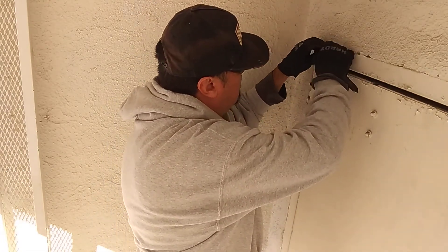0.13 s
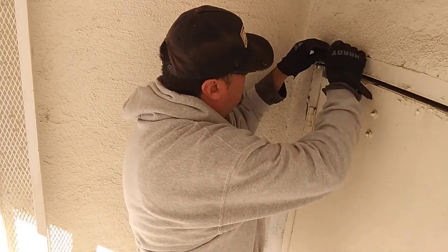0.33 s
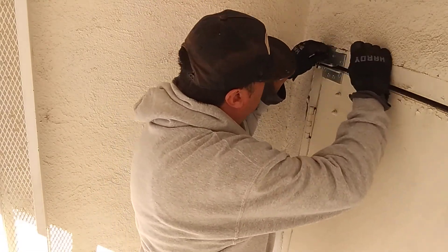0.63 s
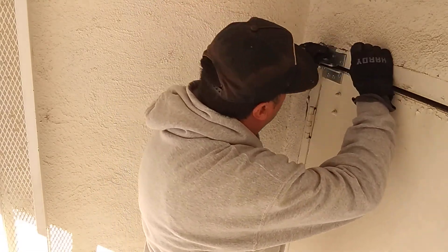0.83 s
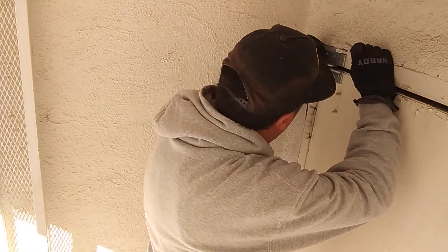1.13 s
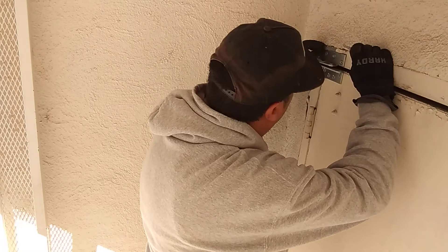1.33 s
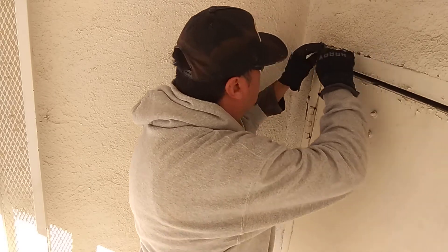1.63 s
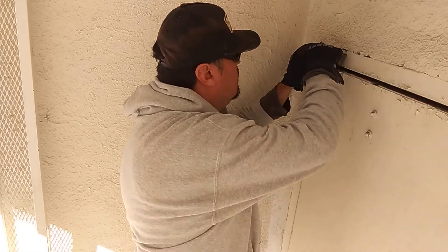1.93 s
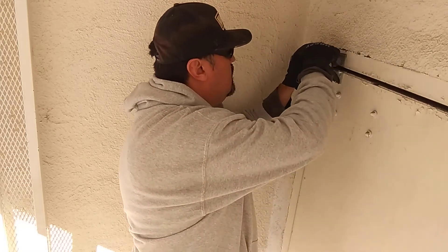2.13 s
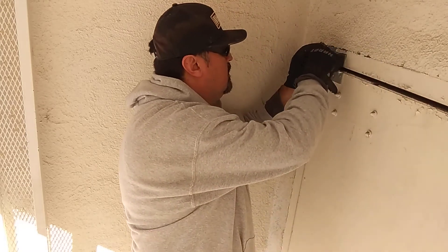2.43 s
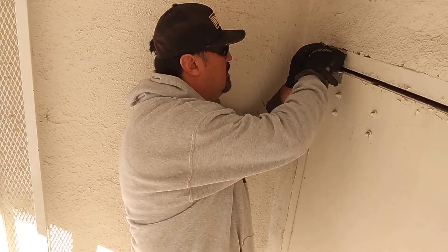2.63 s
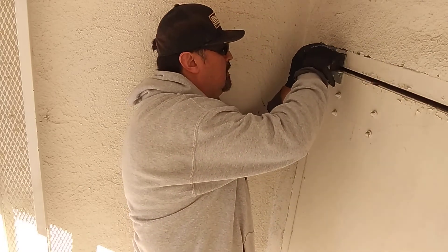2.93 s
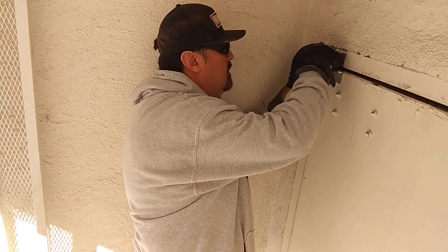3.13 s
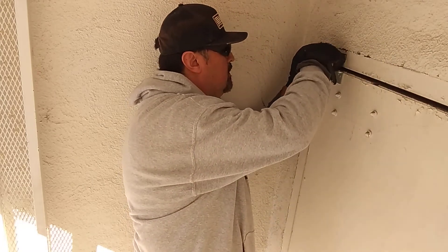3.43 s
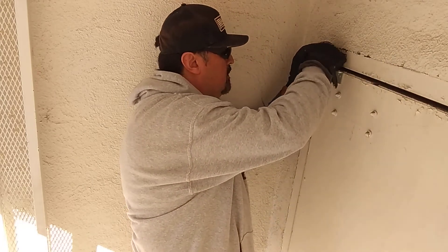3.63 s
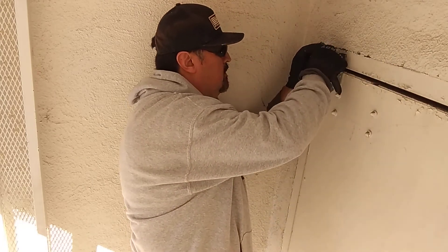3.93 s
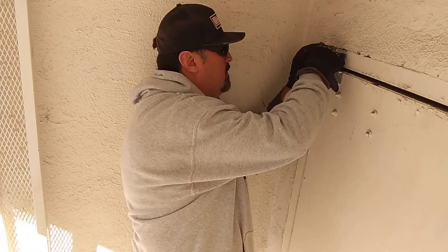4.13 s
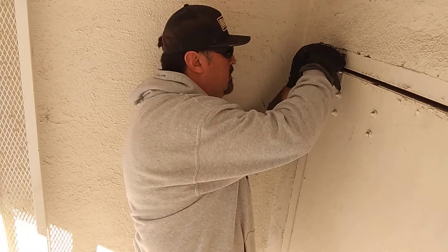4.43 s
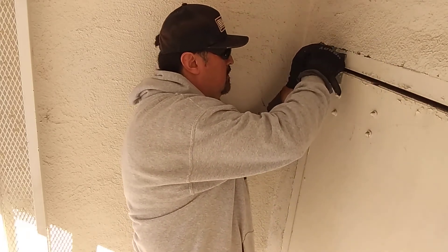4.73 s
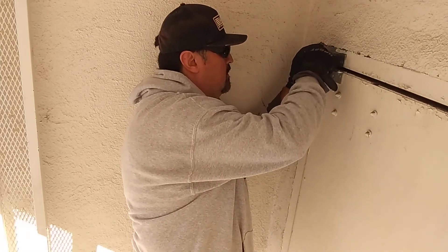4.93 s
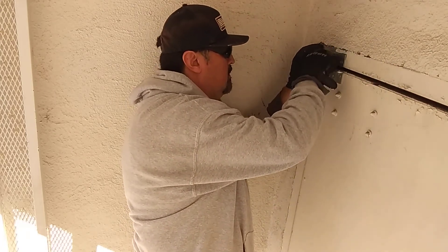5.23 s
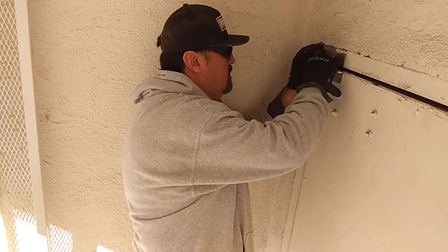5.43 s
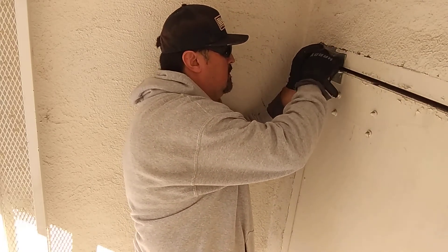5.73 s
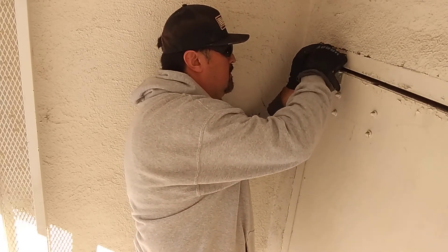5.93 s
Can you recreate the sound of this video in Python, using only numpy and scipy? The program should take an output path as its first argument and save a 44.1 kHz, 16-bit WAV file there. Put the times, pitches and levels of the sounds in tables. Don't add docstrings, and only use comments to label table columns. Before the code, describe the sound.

Close, dry metal clicks and scrapes, uneven in timing, from a tool tip slipping on a hinge plate. Small pinging knocks open, a dense clattering slip bursts out before three seconds, then isolated taps and one firm double knock near five. Fine paint grit crackles and gloves rustle. Far traffic murmurs under light hiss in a small hard-walled porch; a thin steady whine appears at the end.

```python
import sys
import numpy as np
from scipy import signal
from scipy.fft import rfft, irfft, next_fast_len
from scipy.io import wavfile
from scipy.ndimage import uniform_filter1d, map_coordinates

SR = 44100
rng = np.random.default_rng(int(sys.argv[2]) if len(sys.argv) > 2 else 0)


def ratio_of_db(decibels):
    return 10 ** (np.asarray(decibels, float) / 20)


def store_pcm(level_fs):
    pcm = np.round(np.clip(level_fs, -1, 1) * 32767).astype(np.int16)
    wavfile.write(sys.argv[1], SR, np.atleast_2d(pcm).T)


N = 267907

# start in seconds, plate level in dB, shank level in dB,
# plate mode in Hz, shank mode in Hz.
SLIPS = [(.0014, -42, -43.5, 1370, 4200), (.936, -39, -46, 1620, 3700), (1.013, -49.5, -42.5, 2400, 4890),
         (1.382, -39, -33, 2340, 3700), (1.991, -41.5, -44.5, 1790, 4100),
         (2.208, -22.5, -28.5, 2050, 4890), (2.5264, -37, -30.5, 1870, 6400),
         (2.5935, -18, -12.5, 1700, 6320), (2.629, -34, -32, 2060, 6480), (2.66, -21.5, -19, 2040, 6510),
         (2.7153, -21.5, -21, 1770, 6400), (2.7522, -27, -28, 1830, 6500), (2.795, -32, -33, 1530, 3940),
         (2.8144, -34, -32.5, 1990, 6540), (2.934, -35, -36.5, 2030, 4400), (4.21, -26, -30, 1784, 4110),
         (5.0995, -19, -20, 1770, 4110), (5.866, -46, -58, 1600, 5540), (5.998, -42, -54, 1960, 4480),
         (6.03, -35.5, -38, 1580, 5720)]
# as for SLIPS, in seconds, dB, dB, Hz, Hz.
TAPS = [(.315, -25.5, -35, 2210, 3560), (.716, -45, -44.5, 1820, 4660), (.752, -43.5, -44, 1840, 4600),
        (.79, -50, -42, 1720, 4660), (.8597, -28.5, -26, 1773, 6850), (.918, -41, -39.5, 1450, 4560),
        (1.112, -62, -44, 2210, 4470), (2.167, -62, -57, 1300, 4890), (3.112, -45, -41, 2020, 4500),
        (3.671, -35, -31, 2000, 4110), (4.551, -24.5, -30, 2060, 6500), (5.0285, -28, -30, 2030, 5000),
        (5.1346, -20.5, -23, 1770, 4050), (5.322, -46, -70, 1300, 3950), (5.448, -36, -42, 1670, 6550),
        (5.476, -45, -53, 1570, 5370), (5.488, -29, -41, 1800, 3940), (5.555, -43, -56, 1930, 4200)]
# start in seconds, plate level in dB,
# shank level in dB, plate mode in Hz, plate contact in seconds.
PINGS = [(.0424, -27, -32.5, 1770, .014), (.0634, -28.5, -41, 1770, .0063), (.289, -35, -46, 2140, .004),
         (2.08, -39.5, -48, 1780, .0095), (2.501, -28, -35.5, 1910, .0027), (3.698, -42, -50, 1960, .0048),
         (3.921, -40.5, -43, 1810, .0015), (5.388, -24, -40, 1700, .0006), (5.92, -40, -56, 1870, .003)]
# start in seconds, plate level in dB, shank level in dB,
# shank mode in Hz.
BRUSHES = [(.685, -48, -55, 4590), (1.241, -57, -52, 4640), (1.28, -50, -51, 4700), (1.364, -58, -45, 6650),
           (1.469, -47, -51, 4670), (2.469, -49, -46.5, 4710), (3.05, -57, -57, 4670),
           (3.464, -49, -51, 3710), (3.79, -49, -46, 4700), (4.013, -49.5, -64, 5550),
           (4.69, -42.5, -64, 3850), (5.255, -62, -60, 4870), (5.83, -53, -70, 4100)]
# start in seconds, peak level in dB, mode in Hz.
THUMPS = [(.063, -35, 930), (0.312, -43, 480), (2.213, -40, 380), (2.593, -36, 400), (3.672, -38, 500),
          (4.211, -43, 480), (4.55, -38, 460), (5.029, -34, 1050), (5.094, -39.5, 460), (5.134, -43, 354),
          (5.486, -37, 424), (5.51, -39, 400)]
# start in seconds, peak level in dB,
# brightness in dB per octave.
FLAKES = [(.001, -54, 0), (.042, -41, -3), (.288, -52, 2), (.314, -44, 8), (.715, -53, 4), (.752, -52, 4),
          (.789, -48, 6), (.86, -38, -3), (.918, -56, 10), (.936, -53, 0), (1.112, -48, 3),
          (1.383, -32, -4), (2.206, -37, 4), (2.4995, -45, -1), (2.594, -40, 3), (2.629, -41, 3),
          (2.661, -33, 4), (2.715, -37, 8), (2.795, -45, 0), (3.113, -48, -4), (3.672, -55, 3),
          (3.697, -49, -1), (3.79, -53, 0), (4.209, -45, -4), (4.551, -41, 1), (5.028, -45, -3),
          (5.099, -32.5, 7), (5.134, -38, 0), (5.387, -47, -4), (5.487, -54, 0)]
# start in seconds, end in seconds, rasp level in dB,
# plate level in dB.
STROKES = [(0.232, 0.377, -65.5, -80), (1.987, 2.108, -66, -52.5), (2.267, 2.358, -65.5, -61),
           (2.492, 2.565, -56, -43), (2.62, 2.72, -70, -44), (2.75, 2.872, -50, -47),
           (3.66, 3.757, -59, -62), (4.174, 4.245, -64, -48), (4.65, 4.738, -63, -63),
           (5.817, 5.95, -76, -60), (5.973, 6.066, -64, -58)]
# time in seconds, effort in dB.
RUB_EFFORT = [(0, -55), (.12, -68), (.32, -63.5), (.74, -62.5), (1.3, -62), (1.55, -76), (2.04, -82),
              (2.2, -68), (2.57, -63), (2.65, -48), (2.72, -52), (2.87, -62), (3.11, -76), (3.7, -63),
              (4.4, -73), (4.68, -62), (5.07, -76), (5.4, -68)]

# centre in Hz, width in Hz, level in dB.
PLATE_MODES = [(1537, 673, -4.5), (1770, 148, 2.5), (2084, 303, 0.5), (2390, 680, -5.5)]
SHANK_MODES = [(3185, 1500, -18), (4100, 620, -7.5), (4890, 470, -8), (5845, 390, -8), (6490, 630, -8),
               (7170, 1180, -12.5)]
DOOR_MODES = [(655, 154, 2.5), (822, 180, 5), (934, 110, 10.5), (1163, 230, 4)]
# frequency in Hz, level in dB per Hz.
FIZZ_SPECTRUM = [(1500, -60), (3000, -16), (5000, -15), (7500, -8), (9000, -2.5), (11600, -5.5),
                 (13500, -13), (16000, -18)]

# delay in seconds, level in dB.
KNOCK_PATHS = [(.0, 1), (.0095, -10), (.019, -15)]
# delay in seconds, level in dB.
RASP_PATHS = [(.0, -5), (.003, -4.5), (.006, -2.5), (.0095, 3.5), (0.011, -7.5), (.016, -6), (.036, -12.5)]
# delay in seconds, level in dB.
FIZZ_PATHS = [(.0, -3), (.011, -10), (.024, -8.5)]
# frequency in Hz, time to fall 60 dB in seconds.
PORCH_T60 = [(200, 0.5), (530, 0.68), (1400, 0.16), (3700, 0.2), (9700, 0.11)]

# time in seconds, pitch in Hz, level in dB.
SQUEAL = [
    (.94, 2200, -65),
    (1.02, 2220, -65),
    (1.07, 2240, -58.5),
    (1.2, 2300, -59.5),
    (1.27, 2390, -65),
    (1.37, 2430, -72),
]
# time in seconds, pitch in Hz, level in dB.
BIRD = [
    (3.29, 5950, -75),
    (3.35, 5300, -76),
    (3.42, 4930, -77),
    (3.5, 4700, -76),
    (3.6, 4400, -72),
    (3.7, 4150, -65.5),
    (3.82, 4100, -67),
    (3.94, 3940, -69),
]
# time in seconds, pitch in Hz, level in dB.
WHINE = [
    (5.36, 1950, -61.5),
    (6.12, 1950, -57.5),
]
# time in seconds, level in dB.
TRAFFIC_LEVEL = [(0, -57.5), (1.01, -57), (1.69, -60.5), (2.5, -58), (3.2, -59), (4.95, -60), (5.68, -61),
                 (6.07, -57)]
# frequency in Hz, level in dB per Hz.
TRAFFIC_SPECTRUM = [(15, -73), (25, -39), (102, -78), (127, -19), (223, -7.5), (301, -7), (354, -7),
                    (394, -11.5), (427, -4.5), (516, -5.5), (677, -0.5), (775, -5), (840, -0.5),
                    (3340, -23.5), (16000, -35)]

# plate contact in seconds, shank contact in seconds, door thud, plate ring, shank ring in dB.
TAP = (.0015, .0033, -9, 8, -4)
SLIP = (.0065, .008, -7, 6, -3)
BRUSH = (.009, .007, -11, 5, 0)
FLAKE_S = .008


def unit(x):
    return x / np.sqrt(np.mean(x ** 2) + 1e-20)


def along(points, hz):
    f, v = np.transpose(points)
    return np.interp(np.log(hz + 1), np.log(f + 1), v)


def curves(rows):
    s, *cols = np.transpose(rows)
    return [np.interp(np.arange(N) / SR, s, c) for c in cols]


def wobble(rate_hz):
    knots = rng.standard_normal(int(N * rate_hz / SR) + 4)
    return map_coordinates(knots, [np.arange(N) * rate_hz / SR])


def filtered(x, response):
    n = x.shape[-1]
    m = next_fast_len(n + SR // 40, real=True)
    return irfft(rfft(x, m) * response(np.fft.rfftfreq(m, 1 / SR)), m)[..., :n]


def body(modes, top_hz):
    def response(f):
        ring = 0
        for k, (hz, width_hz, db) in enumerate(sorted(map(tuple, modes))):
            damping = 1j * f * width_hz
            ring = ring + (-1) ** k * ratio_of_db(db) * damping / (hz * hz - f * f + damping)
        return ring / (1 - (f / top_hz) ** 2 + 1.4j * f / top_hz)
    return response


def grit(size, spiky_db):
    return rng.standard_normal(size) * ratio_of_db(spiky_db * rng.standard_normal(size))


def add_slip(track, s, db, paths, lengths_s, response):
    lengths_s = np.broadcast_to(lengths_s, len(paths)).clip(.0005, .06)
    t = np.arange(SR // 12) / SR / lengths_s[:, None]
    force = (1 - np.exp(-t / 0.11)) * np.exp(-t ** 1.13)
    bursts = filtered(force * grit(t.shape, spiky_db=3.5), response)
    for x, (delay_s, path_db) in zip(bursts, paths):
        peak = np.sqrt(5 * uniform_filter1d(x * x, size=90).max())
        track[round((s + delay_s) * SR):][:len(x)] += ratio_of_db(db + path_db) * x / peak


def contacts():
    taps = [(*row, *TAP) for row in TAPS]
    slips = [(*row, *SLIP) for row in SLIPS]
    pings = [(s, plate_db, shank_db, hz, 6500, plate_s, .006, -9, 20, -4)
             for s, plate_db, shank_db, hz, plate_s in PINGS]
    brushes = [(s, plate_db, shank_db, 1830, hz, *BRUSH) for s, plate_db, shank_db, hz in BRUSHES]
    return taps + slips + pings + brushes


def knocks():
    out = np.zeros(N + SR)
    for s, db, _, hz, _, plate_s, _, thud_db, ring_db, _ in contacts():
        plate = body([*PLATE_MODES, (hz, 170, ring_db)], top_hz=2710)
        lengths_s = [plate_s + 0.11 * delay_s for delay_s, _ in KNOCK_PATHS]
        add_slip(out, s, db, KNOCK_PATHS, lengths_s, plate)
        door_db = 0.7 * (db + 35) - 35
        add_slip(out, s, door_db, [(0, thud_db)], plate_s + 0.0074, body(DOOR_MODES, top_hz=1400))
    for s, db, hz in THUMPS:
        leaf = body([(0.63 * hz, 120, -3), (hz, 260, 0), (1.52 * hz, 300, -4)], top_hz=900)
        add_slip(out, s, db, [(0, 1)], .01, leaf)
    return out[:N]


def fizz(tilt_db_per_oct):
    def response(f):
        return ratio_of_db(along(FIZZ_SPECTRUM, f) + tilt_db_per_oct * np.log2(np.maximum(f, 3000) / 10000))
    return response


def dulled_shank(hz, ring_db):
    shank = body([*SHANK_MODES, (hz, 480, ring_db)], top_hz=8100)
    dull_hz = 8600
    return lambda f: shank(f) / (1 - (f / dull_hz) ** 2 + 1.2j * f / dull_hz)


def rasps():
    out = np.zeros(N + SR)
    paths = [*RASP_PATHS, (.012, -13)]
    scatter_s = .022
    for s, _, db, _, hz, _, shank_s, _, _, ring_db in contacts():
        octaves = np.log2(hz / 4000)
        lengths_s = [shank_s * 0.6 ** octaves] * len(RASP_PATHS) + [scatter_s]
        add_slip(out, s, db - 5, paths, lengths_s, dulled_shank(hz, ring_db + 10 * octaves))
        add_slip(out, s, db, [(0, -36)], FLAKE_S, fizz(0))
    for s, db, tilt_db_per_oct in FLAKES:
        lengths_s = [FLAKE_S + .3 * delay_s for delay_s, _ in FIZZ_PATHS]
        add_slip(out, s, db, FIZZ_PATHS, lengths_s, fizz(tilt_db_per_oct))
    return out[:N]


def rubbing():
    effort_db, = curves(RUB_EFFORT)
    rasp_gain = ratio_of_db(effort_db - 6.5)
    rustle_gain = ratio_of_db(-58 - 6.5 + 0.7 * (effort_db + 60))
    rumble_gain = ratio_of_db(-66 + 1.05 * (effort_db + 60))
    plate_gain, t = np.zeros(N), np.arange(N) / SR
    for start, end, rasp_db, plate_db in STROKES:
        stroke = np.clip(np.minimum((t - start) / 0.022, (end - t) / 0.027), 0, 1)
        rasp_gain = rasp_gain + ratio_of_db(rasp_db) * stroke
        plate_gain = plate_gain + ratio_of_db(plate_db) * stroke
    shank = body([(hz, 1.6 * width_hz, db) for hz, width_hz, db in SHANK_MODES], top_hz=8000)
    rasp = unit(filtered(grit(N, spiky_db=5.5), shank))
    rustle = unit(filtered(grit(N, spiky_db=4.5), body([(1870, 1100, 0)], top_hz=3000)))
    plate = unit(filtered(grit(N, spiky_db=4.5), body(PLATE_MODES, top_hz=2400)))
    rumble = unit(filtered(grit(N, spiky_db=2.5), body([(330, 220, -4), (780, 600, 0)], top_hz=1500)))
    door = (rumble_gain + ratio_of_db(-4) * plate_gain) * rumble
    return ratio_of_db(3.0 * wobble(25)) * (rasp_gain * rasp + rustle_gain * rustle + plate_gain * plate) + door


def porch(x):
    out, step = np.zeros(N + SR), SR // 4
    for start in range(0, N, step):
        hz, t, z = signal.stft(rng.standard_normal(SR // 3), SR, nperseg=256)
        decay = ratio_of_db(-60 * t / along(PORCH_T60, hz)[:, None])
        tail = signal.istft(z * decay, SR, nperseg=256)[1]
        answer = signal.fftconvolve(x[start:start + step], tail / np.linalg.norm(tail))
        out[round((start / SR + .005) * SR):][:len(answer)] += answer
    return out[:N]


def far_tone(rows, rough_db, rough_hz, waver):
    hz, db = curves(rows)
    t = np.arange(N) / SR
    gate = np.clip(np.minimum(t - rows[0][0], rows[-1][0] - t) / 0.04, 0, 1)
    phase = 2 * np.pi * np.cumsum(hz * (1 + waver * wobble(450))) / SR
    return np.sqrt(2) * gate * ratio_of_db(db + rough_db * wobble(rough_hz)) * np.sin(phase)


def whine():
    apart_hz, loud_s, size = 11.9, 5.583, .6
    turn = np.exp(2j * np.pi * apart_hz * (np.arange(N) / SR - loud_s))
    beat = np.abs(1 + size * turn) / (1 + size)
    return beat * far_tone(WHINE, rough_db=2, rough_hz=30, waver=.004)


def street():
    level_db, = curves(TRAFFIC_LEVEL)
    z = signal.stft(rng.standard_normal(N), nperseg=512)[2]
    field = uniform_filter1d(uniform_filter1d(rng.standard_normal(z.shape), 5, 0), 12, 1)
    patchy = signal.istft(z * ratio_of_db(1.5 * unit(field)), nperseg=512)[1][:N]
    split_hz = 2500
    hum = unit(filtered(patchy, lambda f: ratio_of_db(along(TRAFFIC_SPECTRUM, f)) / (1 + (f / split_hz) ** 4)))
    hiss = unit(filtered(rng.standard_normal(N),
                         lambda f: ratio_of_db(along(TRAFFIC_SPECTRUM, f)) / (1 + (split_hz / (f + 1)) ** 4)))
    return ratio_of_db(level_db + 1.88) * hum + ratio_of_db(-72.5) * hiss


def scene():
    knock, rasp = knocks(), rasps()
    wet = porch(ratio_of_db(-8) * knock + ratio_of_db(-12) * rasp)
    squeal = far_tone(SQUEAL, rough_db=4, rough_hz=110, waver=.028)
    bird = far_tone(BIRD, rough_db=5, rough_hz=70, waver=.005)
    return (knock + rasp + wet + rubbing() + squeal + bird + whine() + street())[None]


def top_cut(x):
    return signal.sosfilt(signal.butter(12, 16470, fs=SR, output="sos"), x)


def record(dry):
    b, a = signal.butter(4, 2 * np.pi * 135, "high", analog=True)
    heard = filtered(dry[0], lambda f: signal.freqs(b, a, 2 * np.pi * f)[1])
    heard = heard + ratio_of_db(-75.5) * rng.standard_normal(N)
    heard = filtered(heard, lambda f: np.where(f < 15850, 1, ratio_of_db(-27.5)))
    return top_cut(heard[None])


dry = scene()
out = record(dry)
store_pcm(out)
```